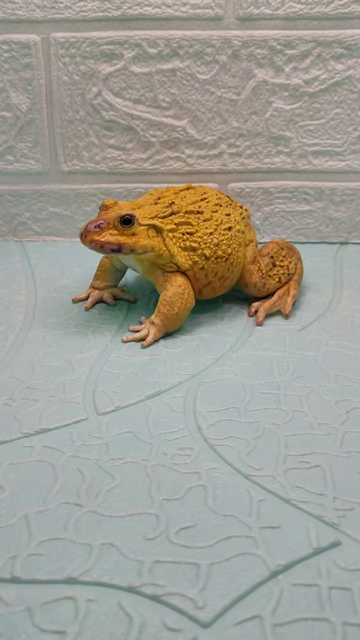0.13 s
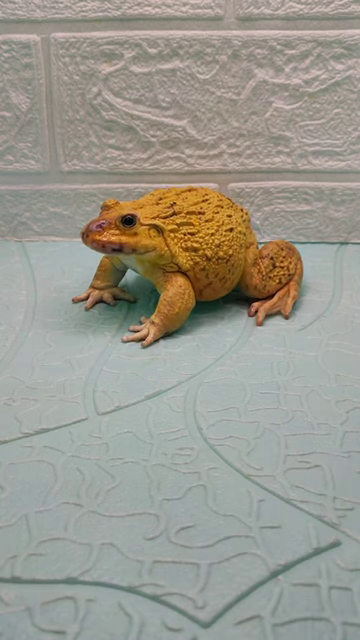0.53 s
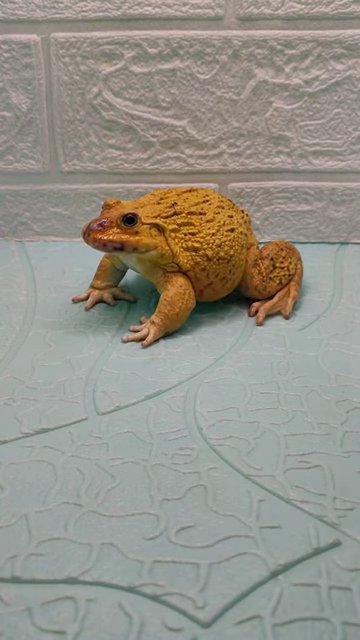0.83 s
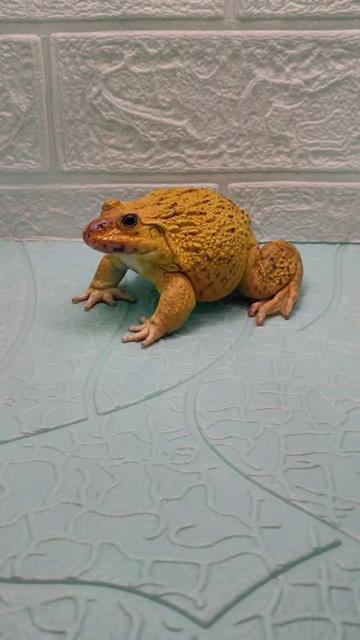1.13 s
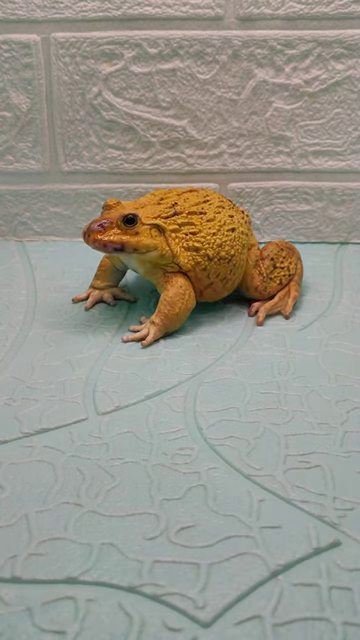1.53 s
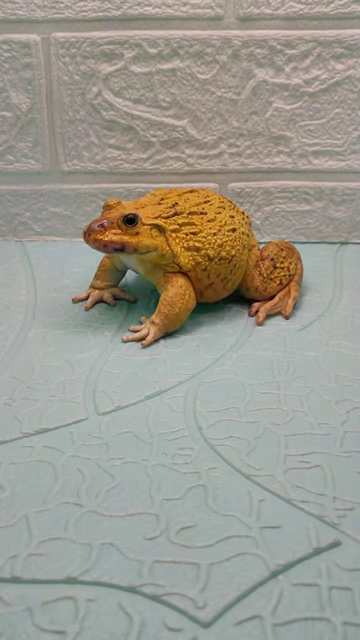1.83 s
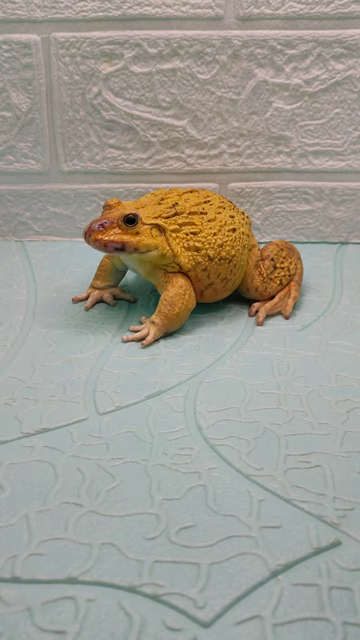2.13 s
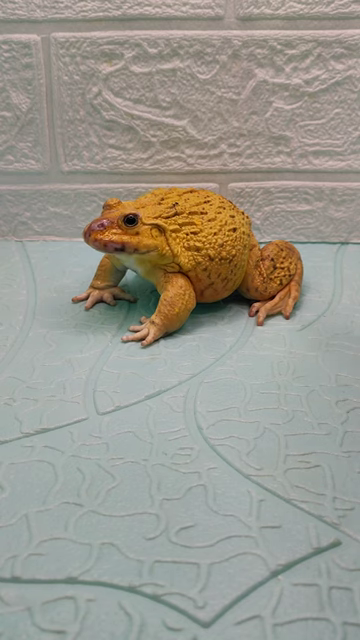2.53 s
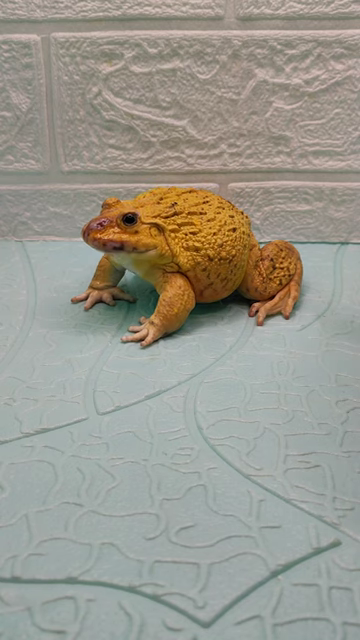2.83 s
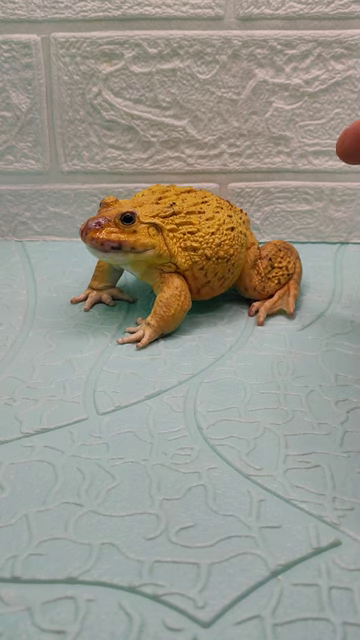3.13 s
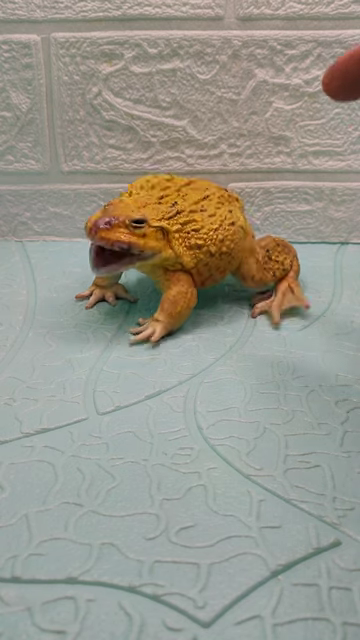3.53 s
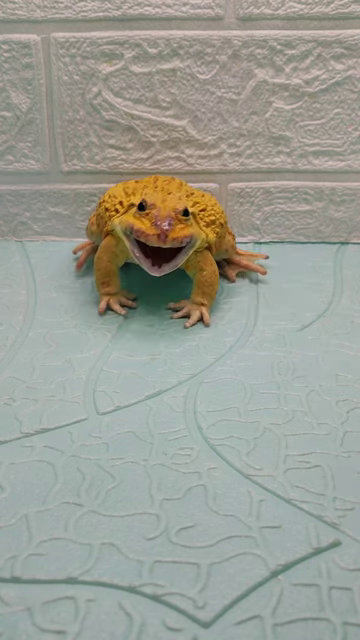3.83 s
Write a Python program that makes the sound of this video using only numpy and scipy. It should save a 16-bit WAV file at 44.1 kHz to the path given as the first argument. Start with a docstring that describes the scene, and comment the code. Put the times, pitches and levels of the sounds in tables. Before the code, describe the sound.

A frog screams, loud, shrill and raspy, after a stretch of quiet room hum, a faint rustle and a thin hiss. Rushing air and dull thuds on a mat run under the scream, close to the microphone.

```python
"""A frog sits in a quiet, humming room. A faint rustle passes, then it hisses as a finger nears.
At 3.6 s it screams with its mouth wide open, as air makes its vocal folds vibrate.
The scream arches up, settles, breaks into a harsh rasp an octave down, clears and sags away.
Under it ride a ragged low rush of air and dull thuds as the frog scrambles on a mat.
Floor and wall throw the voice back to a close stereo microphone."""
import sys
import numpy as np
from scipy import signal
from scipy.fft import rfft, irfft
from scipy.io import wavfile

SR = 44100
rng = np.random.default_rng(int(sys.argv[2]) if len(sys.argv) > 2 else 0)


def unload_wav(signal):
    """Save mono or channel-first audio to the path in sys.argv[1] as 16-bit WAV at rate SR, clipped to [-1, 1]."""
    wavfile.write(
        sys.argv[1],
        SR,
        np.round(np.clip(np.atleast_2d(signal).T, -1, 1) * 32767).astype(np.int16),
    )


N = 176400
TIME = np.arange(N) / SR
FREQS = np.fft.rfftfreq(N, 1 / SR)
TOP_HZ = 15850

# how fast the vocal folds vibrate (time [s], pitch [Hz])
SCREAM_PITCH = [(3.602, 1560), (3.61, 1670), (3.624, 1862), (3.638, 1898), (3.658, 1850), (3.668, 1765),
                (3.68, 1638), (3.692, 1528), (3.708, 1432), (3.73, 1408), (3.76, 1442), (3.763, 1545),
                (3.778, 1485), (3.79, 1523), (3.812, 1428), (3.83, 1398), (3.844, 1468), (3.872, 1436),
                (3.915, 1410), (3.932, 1390), (3.948, 1355), (3.963, 1305), (3.978, 1200), (4.0, 1060)]
# how hard the frog screams (time [s], level [dB])
SCREAM_LEVEL = [(3.597, -63), (3.604, -19), (3.61, -20), (3.618, -15), (3.633, -13.5), (3.655, -16.5),
                (3.669, -18), (3.684, -18), (3.7, -17.5), (3.735, -19.5), (3.76, -20.5), (3.79, -19.5),
                (3.815, -23.5), (3.85, -21), (3.9, -20), (3.93, -21), (3.96, -24), (4.0, -29)]
# how unevenly the folds vibrate (time [s], roughness [0-1])
ROUGHNESS = [(3.604, .9), (3.616, .6), (3.625, .06), (3.655, .08), (3.672, .5), (3.695, .45), (3.712, .07),
             (3.755, .08), (3.768, .65), (3.825, .55), (3.845, .22), (3.92, .07), (3.955, .1), (3.975, .7),
             (4.0, .8)]
# how much every second pulse weakens, making the rasp (time [s], amount [0-1])
RASP = [(3.757, 0.02), (3.764, 1), (3.795, 1), (3.83, 0.9), (3.843, 0.48), (3.87, 0.42), (3.895, 0.27),
        (3.915, 0)]
# extra level for the scream's lowest tones (time [s], gain [dB])
LOW_BOOST = [(3.605, 9), (3.618, -2.5), (3.64, -0.5), (3.66, -6), (3.685, 0.5), (3.7, -11), (3.732, 10.5),
             (3.757, -15.5), (3.79, 3.5), (3.815, -7.5), (3.865, -6.5), (3.9, -3), (3.94, 8.5),
             (3.965, 2.5), (3.99, -15)]
# tone colour of throat and mouth at each microphone (frequency [Hz], left [dB], right [dB])
THROAT_COLOUR = [(750, 7, -30), (1350, -5, -14.5), (1900, -7, -10), (2330, -1, -24), (2740, -5.5, -4),
                 (3830, -3, -4), (4480, -12, -11.5), (5270, -5, -16.5), (5560, -15, -19.5),
                 (6100, -10.5, -19), (7000, -10, -23.5), (7650, -22.5, -21), (8530, -6, -21),
                 (9400, 0, -1.5), (10330, -8.5, -5.5), (11200, -22, 3), (12370, -13.5, -6),
                 (13300, -3.5, -10), (14200, -20, -1), (15200, -7, -4)]
# low rush of air (time [s], level [dB])
RUSH_LEVEL = [(3.6, -37), (3.612, -37), (3.62, -27.5), (3.665, -22), (3.7, -26), (3.75, -31), (3.77, -23),
              (3.81, -23.5), (3.87, -27.5), (3.925, -27.5), (3.955, -31), (3.975, -25), (3.987, -50)]
# its tone colour (frequency [Hz], gain [dB])
RUSH_TONE = [(20, 1.5), (70, 0.5), (160, -1), (320, -7), (800, -7.5), (1500, -11.5), (2400, -15.5),
             (3200, -18), (4800, -30), (16000, -54)]
# bumps on the mat (time [s], level [dB])
THUD_HITS = [(3.615, -21), (3.624, -19.5), (3.663, -19), (3.681, -28), (3.726, -24), (3.782, -28),
             (3.806, -31), (3.919, -29), (3.967, -16.5), (3.979, -25.5)]
# their tone colour (frequency [Hz], gain [dB])
THUD_TONE = [(20, -3.5), (130, -1.5), (350, -9.5), (900, -14), (2000, -32), (6000, -52)]
# hiss before the scream (time [s], level [dB])
HISS_LEVEL = [(3.17, -93), (3.2, -65), (3.38, -64.5), (3.5, -56), (3.57, -56), (3.6, -53.5), (3.62, -95)]
# its tone colour (frequency [Hz], gain [dB])
HISS_TONE = [(20, -50), (8800, -18), (9900, 3), (11000, 5), (12000, 1), (13000, -9), (14200, -3.5),
             (15800, -9)]
# faint rustle (time [s], level [dB])
RUSTLE_LEVEL = [(2.2, -80), (2.34, -63), (2.43, -52), (2.48, -70), (2.56, -85)]
# its tone colour (frequency [Hz], gain [dB])
RUSTLE_TONE = [(20, -30), (1500, -20), (2300, 6), (2900, -9), (3600, -9), (5000, -16), (16000, -28)]
# echoes off floor and wall (delay [s], left gain [ratio], right gain [ratio])
NEAR_ECHOES = [(.0023, 0.19, -0.11), (.0052, -0.24, .07)]
# tone colour of the room's air noise (frequency [Hz], gain [dB])
AIR_TONE = [(12, -25), (20, -8.5), (33, -8), (64, 0.5), (101, -9), (137, -2), (161, -9), (196, -6),
            (306, -16.5), (478, -8.5), (534, -17.5), (746, -15.5), (958, -20.5), (1040, -18.5),
            (2150, -18.5), (2840, -26), (3540, -21.5), (4950, -32.5), (15500, -37)]
# how alike that noise is on both sides (frequency [Hz], likeness [-1 to 1])
AIR_LIKENESS = [(60, 0.97), (180, 0.94), (550, 0.59), (1650, -0.37), (4970, 0.067), (15000, -0.027)]
# which side it leans to (frequency [Hz], left minus right [dB])
AIR_LEAN = [(60, -0.5), (180, 2), (550, -3), (1650, -5.5), (4970, -3), (15000, -4.5)]
# tones of the room's hum (frequency [Hz], level [dB])
HUM_TONES = [(59.2, -68), (134.6, -59.5), (203, -63.5), (474, -72.5)]


def scream():
    """The vocal folds chop air into uneven pulses, making a shrill voice mixed with breath."""
    roughness = np.clip(curve(ROUGHNESS), 0, 1)
    jitter = 0.022 * roughness * wander(hz=700)
    waver = 0.0025 * wander(hz=90)
    cycles = np.cumsum(curve(SCREAM_PITCH) * (1 + jitter + waver)) / SR
    voice = fold_tones(cycles)
    voice *= 1 + 0.69 * roughness * wander(hz=700)  # the level trembles too
    return level(SCREAM_LEVEL) * (voice + amp(-15) * roughness * breath(cycles))


def fold_tones(cycles, mouth_hz=3383, mouth_width_hz=168, mic_lag_s=0.00017, smear_s=0.0011):
    """The pulses make a stack of tones at multiples of the pitch, shaped by throat and mouth."""
    on = TIME >= SCREAM_LEVEL[0][0]
    pitch, boost_db = curve(SCREAM_PITCH)[on], curve(LOW_BOOST)[on]
    rasp = np.clip(curve(RASP), 0, 1)[on]
    voice = np.zeros((2, N))
    for multiple in np.arange(1, 30) / 2:
        hz = multiple * pitch
        # strong and weak pulses in turn add tones halfway between the usual ones
        size = (rasp if multiple % 1 else 1) / np.sqrt(1 + rasp ** 2) * (hz < TOP_HZ)
        low_db = boost_db / (1 + (hz / 2480) ** 6)
        # a tone flares as it glides through the pitch at which the mouth rings
        mouth_db = 9 / (1 + ((hz - mouth_hz) / mouth_width_hz) ** 2)
        for side in range(2):
            delay = side * mic_lag_s + smear_s * hz / TOP_HZ / 2  # the throat smears each pulse
            # each tone flickers in timing and level as the frog moves
            flicker_rad = 0.6 * drift(TIME[on], hz=22)
            flicker_db = 2.5 * drift(TIME[on], hz=22)
            wave = np.cos(2 * np.pi * (multiple * cycles[on] - delay * hz) + flicker_rad)
            db = low_db + mouth_db + read(THROAT_COLOUR, hz, column=side + 1) + flicker_db
            voice[side, on] += np.sqrt(2) * size * amp(db) * wave
    return voice


def breath(cycles):
    """One puff of air passes through the throat each time the folds open."""
    puffs = noise() * (1 + np.cos(2 * np.pi * cycles))
    return tint(puffs, [read(THROAT_COLOUR, column=side + 1) for side in range(2)])


def rush():
    """Swirling air makes a ragged low rush under the scream, different at each microphone."""
    flutter_db = 3 * wander(hz=130)
    return level(RUSH_LEVEL) * tint(noise() * amp(flutter_db), read(RUSH_TONE))


def thuds(attack_s=0.0005, decay_s=0.0082):
    """The frog lunges and scrambles on the mat, making dull bumps that do not ring."""
    loudness = np.zeros(N)
    for start, db in THUD_HITS:
        age = np.maximum(TIME - start, 0)
        loudness += amp(db) * np.minimum(age / attack_s, 1) * np.exp(-age / decay_s)
    return loudness * tint(noise(), read(THUD_TONE))


def hiss():
    """A thin hiss, likely air in the frog's nostrils, swells until the mouth opens."""
    lean_right = amp([[-3.25], [3.25]])
    return level(HISS_LEVEL) * tint(noise(), read(HISS_TONE)) * lean_right


def rustle():
    """One soft swish, likely an arm moving in."""
    return level(RUSTLE_LEVEL) * tint(noise(), read(RUSTLE_TONE))


def room_echo(sound, tail_db=-19, fade_s=0.2):
    """Floor and wall add two quick echoes and a short, faint tail to the sound."""
    t = TIME[:SR // 2]
    response = rng.standard_normal((2, len(t))) * amp(-60 * t / fade_s)
    response *= amp(tail_db) / np.linalg.norm(response[0])
    response[:, 0] += 1  # the sound that arrives directly
    for delay, left, right in NEAR_ECHOES:
        response[:, round(delay * SR)] += left, right
    return signal.fftconvolve(sound, response, axes=1)[:, :N]


def room_air():
    """Steady, dull air noise whose deepest part is nearly the same on both sides."""
    left, other = rfft(noise())
    likeness = np.clip(read(AIR_LIKENESS), -1, 1)
    right = likeness * left + np.sqrt(1 - likeness ** 2) * other
    pair = irfft(np.array([left, right]), N)
    lean_db = read(AIR_LEAN) / 2
    return amp(-48.5) * tint(pair, read(AIR_TONE) + np.array([lean_db, -lean_db]))


def room_hum(waver_hz=7.3):
    """A few low tones hum in the room, each wavering at random."""
    hum = np.zeros(N)
    for hz, db in HUM_TONES:
        phase = 2 * np.pi * hz * TIME
        hum += amp(db) * (wander(waver_hz) * np.cos(phase) + wander(waver_hz) * np.sin(phase))
    return hum


def amp(db):
    """Turns decibels into a number to multiply by."""
    return 10 ** (np.asarray(db) / 20)


def unit(x):
    """Scales a signal to an average size (rms) of 1."""
    return x / np.sqrt(np.mean(x ** 2) + 1e-20)


def curve(points):
    """Joins a table's points with straight lines over time."""
    return np.interp(TIME, *np.transpose(points))


def level(points):
    """Gain from a dB curve, silent before its first point."""
    return amp(curve(points)) * (TIME >= points[0][0])


def read(points, hz=FREQS, column=1):
    """Looks up a table by frequency, with octaves evenly spaced."""
    table = np.transpose(points)
    return np.interp(np.log(hz + 1), np.log(table[0] + 1), table[column])


def noise():
    """Separate white noise for left and right."""
    return rng.standard_normal((2, N))


def tint(x, db):
    """Turns each frequency up or down, then scales the result to size 1."""
    return unit(irfft(rfft(x) * amp(db), N))


def wander(hz):
    """A random wobble, mostly slower than the given rate."""
    return unit(irfft(rfft(rng.standard_normal(N)) / (1 + (FREQS / hz) ** 4), N))


def drift(t, hz, count=5):
    """A smooth wobble from a few random sine waves below the given rate."""
    rate, phase = rng.random((2, count, 1))
    return np.sqrt(2 / count) * np.sin(2 * np.pi * (hz * rate * t + phase)).sum(0)


def scene():
    """The frog in its room; only the scream and hiss echo."""
    return room_echo(scream() + hiss()) + rush() + thuds() + rustle() + room_air() + room_hum()


def record(dry):
    """Cuts away the very highest treble."""
    low_pass = signal.firwin(511, TOP_HZ, window=("kaiser", 9), fs=SR)
    return signal.oaconvolve(dry, low_pass[None], "same")


dry = scene()
out = record(dry)
unload_wav(out)
```